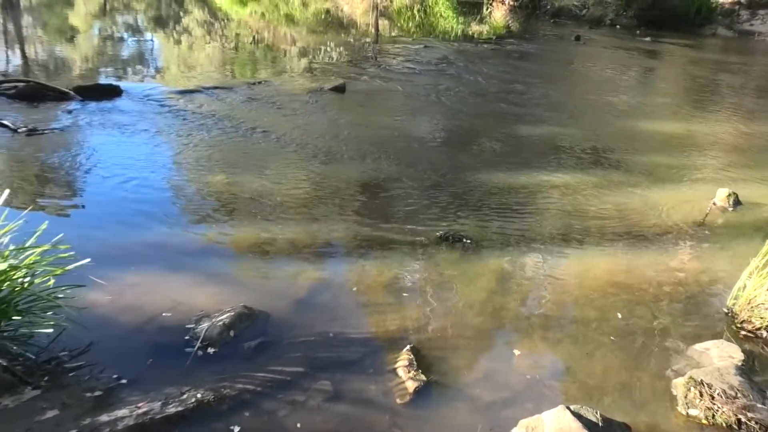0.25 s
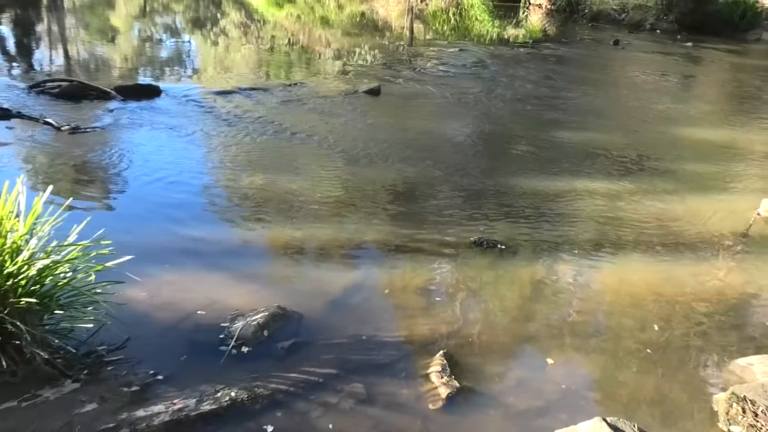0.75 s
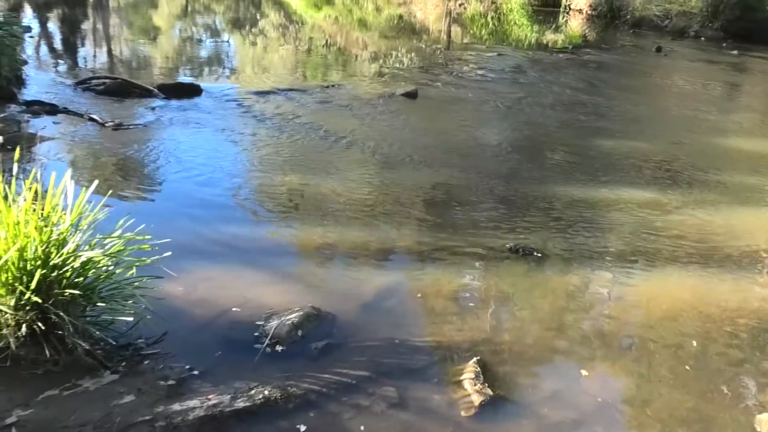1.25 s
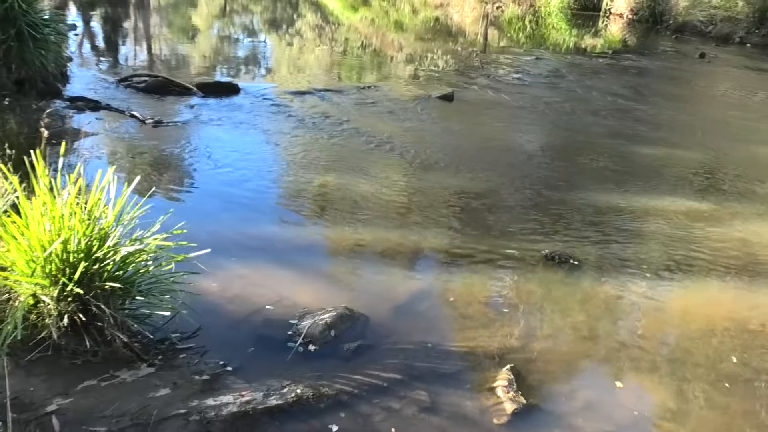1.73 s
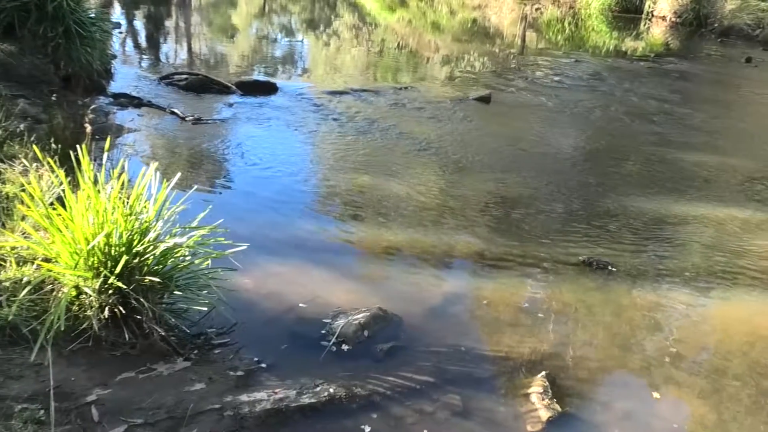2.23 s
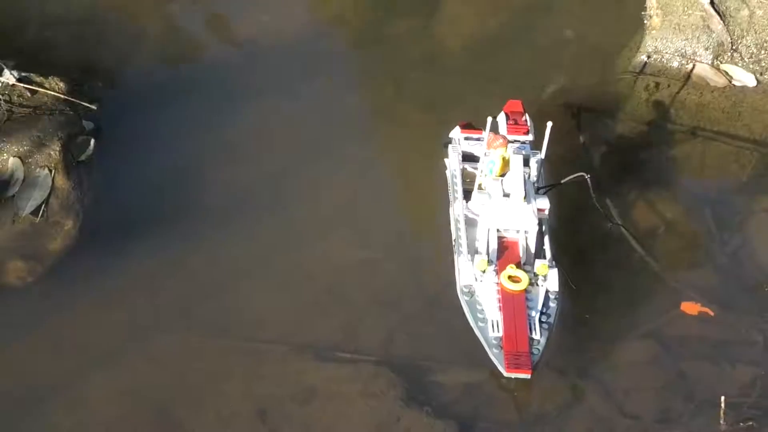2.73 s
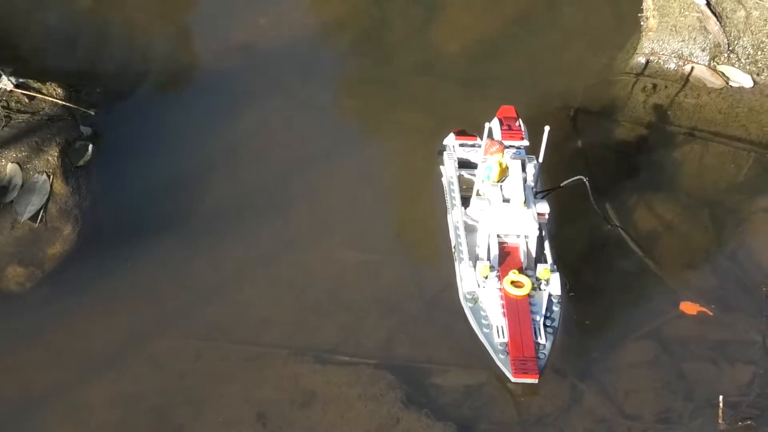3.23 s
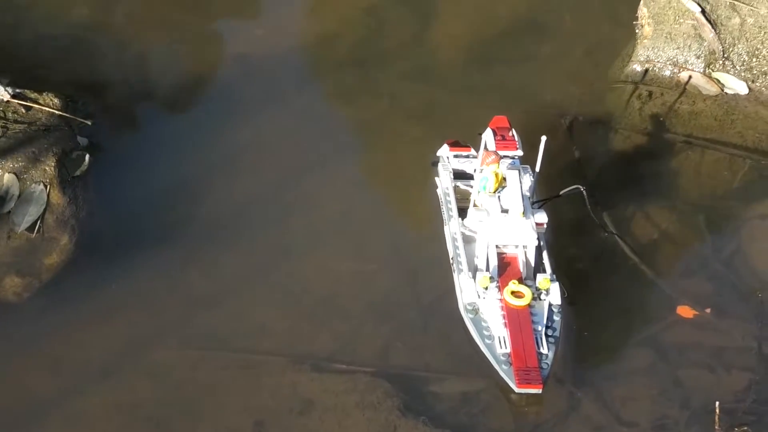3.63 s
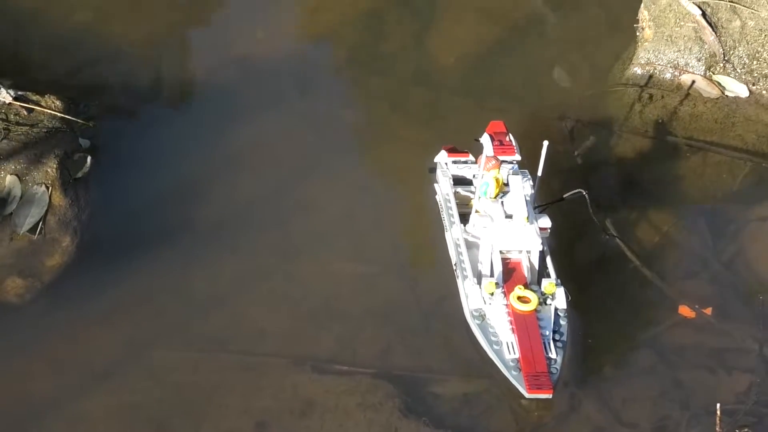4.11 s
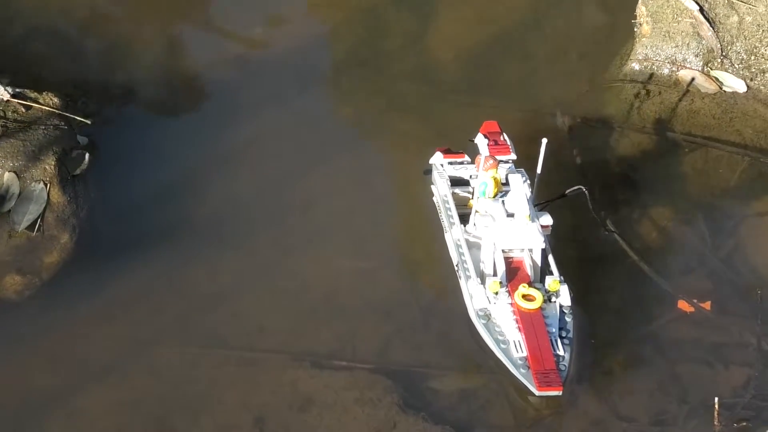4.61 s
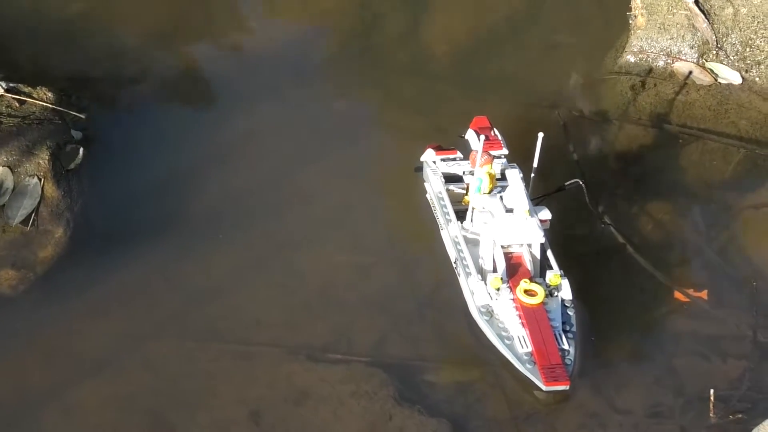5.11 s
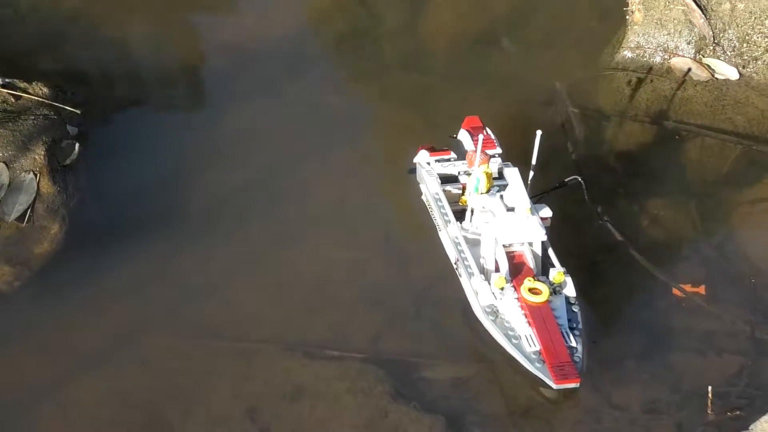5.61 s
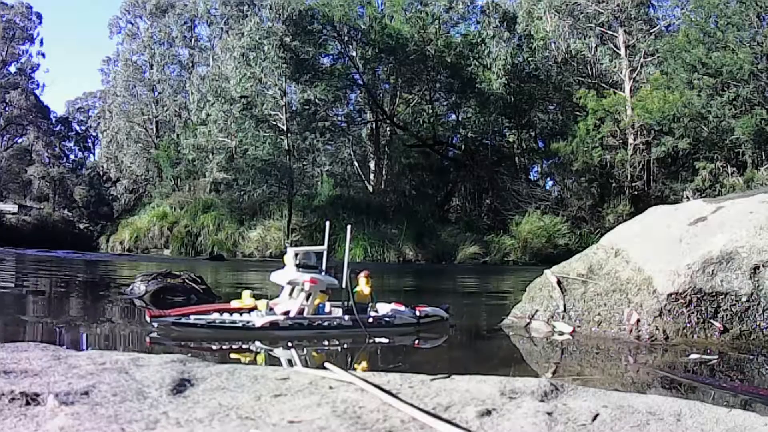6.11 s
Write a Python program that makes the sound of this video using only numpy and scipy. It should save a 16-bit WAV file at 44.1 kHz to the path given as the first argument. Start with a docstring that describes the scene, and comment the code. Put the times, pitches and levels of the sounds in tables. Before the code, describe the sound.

A shallow creek rushes steadily over rocks outdoors, with a few small plops and faint, thin high chirps. Wind presses on the microphone above a deep roll of water and a wavering low hum. About halfway, the water sounds nearer, with tiny ticks of spray. Near the end it all cuts abruptly to a much quieter spot with a far trickle and faint hiss.

```python
"""A shallow creek rushes over rocks, heard from the bank and, after about 3 s, from nearer the water.
Countless small bubbles, each a resonating pocket of air, make the rush; a few plops, ticks of spray and
thin, high chirps stand out. Wind presses on the microphone over a deep roll of water and a wavering hum.
Near the end the sound cuts to a much quieter spot with a far trickle and faint hiss."""
import sys
import numpy as np
from scipy import signal
from scipy.fft import rfft, irfft, next_fast_len
from scipy.io import wavfile
from scipy.ndimage import uniform_filter1d

SR = 44100
rng = np.random.default_rng(int(sys.argv[2]) if len(sys.argv) > 2 else 0)


def store_pcm(level_fs):
    """Save levels as 16-bit WAV."""
    pcm = np.round(np.clip(level_fs, -1, 1) * 32767).astype(np.int16)
    wavfile.write(sys.argv[1], SR, np.atleast_2d(pcm).T)


N = 280022

# Listening position: (time [s], nearness [0 bank to 1 waterside])
NEARNESS_CURVE = [(0, 0.22), (2.95, 0.015), (3.2, 0.68), (5.8, 0.86)]
# Loudness of the rush: (time [s], level [dB])
RUSH_LEVEL = [(0, -31.5), (.9, -32), (2.7, -32.5), (3.2, -31.5), (4.0, -30.5), (5.25, -31), (5.8, -31)]
# Emphasis of the rush around 3 kHz: (time [s], gain [dB])
FIZZ_GAIN = [(0, 1), (1.6, 0), (2.6, -1.3), (3.3, -0.5), (4, 0.5), (5.8, 0)]
# Spectrum of the rush at each position: (frequency [Hz], relative density [dB])
RUSH_BANK_SPECTRUM = [(260, -64.5), (380, -63.5), (680, -60.5), (830, -66), (1020, -61.5), (1250, -67.5),
                      (1600, -66), (2280, -74), (3500, -73.5), (4650, -76.5), (5020, -82), (6400, -89.5),
                      (7100, -91), (10500, -102.4), (15000, -114)]
RUSH_NEAR_SPECTRUM = [(270, -66.5), (540, -60.5), (1100, -63.5), (1520, -59.5), (1840, -68.5), (2020, -66),
                      (2250, -70.5), (3400, -76), (4640, -78.5), (4880, -85), (6500, -93.5), (7350, -90.5),
                      (10500, -102), (15000, -113)]
# Bubble plops and, at 7-8.5 kHz, thin chirps, perhaps distant birds:
# (time [s], level [dB], start frequency [Hz], glide [ratio], duration [s])
PLOPS_AND_CHIRPS = [(0.735, -30.5, 296, 1.47, 0.086), (0.874, -32.5, 1557, 0.96, 0.037),
                    (0.927, -30.5, 1198, 1.1, 0.016), (1.015, -40, 2240, 1.04, .024),
                    (1.762, -30, 3070, 1.35, 0.0076), (2.107, -47, 7100, 0.95, .024),
                    (2.312, -42, 5930, 0.77, 0.0089), (2.825, -54, 8400, 1.03, .015),
                    (3.355, -51, 7950, 1.03, .009), (3.438, -36, 3640, 1.2, 0.0072),
                    (3.913, -50, 7200, 1.2, .024), (4.208, -28.5, 1470, 1.15, 0.016),
                    (4.461, -37, 3700, 0.98, .008), (4.59, -53, 7300, 1.1, .03),
                    (4.728, -53, 7600, 0.95, .035), (5.035, -51.5, 7440, 0.98, .032),
                    (5.172, -53, 8500, 1, .03), (5.18, -49, 7600, 0.94, .036),
                    (5.485, -58, 7900, 0.96, .035), (5.598, -30, 1600, 0.99, 0.015),
                    (5.632, -23, 860, 1.27, 0.0154), (5.583, -37, 1520, 0.95, .012),
                    (5.663, -30, 740, 0.97, 0.012)]
# Ticks of spray: (time [s], peak level [dB])
SPRAY_EVENTS = [(3.263, -44), (3.436, -42), (4.0028, -39), (4.5819, -40), (4.5964, -41), (4.628, -43),
                (4.7251, -42), (4.8075, -44), (4.866, -45), (5.1037, -43), (5.1377, -39), (5.2255, -36),
                (5.2835, -44), (5.3314, -44), (5.371, -42), (5.4202, -43), (5.4685, -45), (5.5634, -46)]
# Gusts of wind: (time [s], level [dB])
WIND_LEVEL = [(0, -13.5), (.06, -10.5), (.25, -19), (.55, -16), (.72, -12.5), (.88, -20), (1.05, -13.5),
              (1.45, -13), (1.75, -16), (1.95, -20), (2.2, -8.5), (2.45, -12), (2.55, -23), (2.7, -15),
              (3.0, -18), (3.2, -23), (3.35, -17), (3.82, -15.5), (3.95, -24), (4.2, -23.5), (4.4, -30.5),
              (4.55, -19), (4.7, -21.5), (4.85, -16.5), (5.15, -21), (5.35, -18), (5.6, -21), (5.79, -20.5)]
# Spectrum of the wind pressure at each position: (frequency [Hz], relative density [dB])
WIND_BANK_SPECTRUM = [(1, -34), (6.5, -24), (10, -28), (17, -36), (24, -48), (34, -59)]
WIND_NEAR_SPECTRUM = [(1, -46), (5.5, -35), (10, -28.5), (17, -35), (24, -43), (34, -52)]
# Spectrum of the water's deep roll at each position: (frequency [Hz], relative density [dB])
ROLL_BANK_SPECTRUM = [(32, -50), (48, -52), (75, -55.5), (108, -57), (125, -68.5), (200, -64.5)]
ROLL_NEAR_SPECTRUM = [(32, -76), (44, -49), (60, -59), (100, -60), (155, -58), (200, -60)]
# Tones of the hum at each position: (frequency [Hz], bandwidth [Hz], relative level [dB])
HUM_BANK_TONES = [(55.8, 13, -45.5), (111.4, 5.8, -47.5)]
HUM_NEAR_TONES = [(85.7, 15.3, -42.5), (123.4, 8.5, -47), (147, 8.4, -45)]
# Swells of the strongest low tone: (time [s], level [dB])
DRONE_LEVEL = [(0, -33), (.25, -47), (.5, -39.5), (.7, -42.5), (.86, -35.5), (1.2, -34), (1.3, -54),
               (1.53, -32.5), (1.75, -54), (2.05, -36), (2.15, -51), (2.47, -33.5), (2.75, -42),
               (2.95, -59), (3.2, -37), (3.3, -54), (3.7, -51), (3.81, -34), (3.95, -57)]
# Spectrum of the quiet spot: (frequency [Hz], relative density [dB])
QUIET_SPECTRUM = [(35, -108), (90, -94.5), (130, -91), (200, -87.5), (330, -92), (420, -89.5), (730, -94),
                  (1100, -94.5), (1290, -89), (1500, -97), (2200, -100), (4000, -103), (12600, -105),
                  (12900, -145)]


def rush(froth_share=0.25, patch_db=0.54, surge_db=0.53, spray_db=0.9, drift_db=0.3):
    """Incoherent sources add in power: froth and far hiss merge, coloured by the listening position."""
    water = crossfade(rng.standard_normal(N), froth(), froth_share)
    hz, t, spectrum = signal.stft(water, SR, nperseg=512, noverlap=384)
    near = follow(NEARNESS_CURVE, t)
    bank_db, near_db = spectrum_db(RUSH_BANK_SPECTRUM, hz), spectrum_db(RUSH_NEAR_SPECTRUM, hz)
    colour = gain_of(np.outer(bank_db, 1 - near) + np.outer(near_db, near))
    colour /= np.sqrt(np.mean(colour ** 2, axis=0))  # equal power at every position
    patches = random_patches(spectrum.shape, bins=8, frames=24)
    surges = random_drift(len(t), frames=9)  # shared by all frequencies
    treble_db = spray_db + drift_db * random_drift(len(t), frames=50)
    treble_band = 1 / (1 + (5500 / (hz + 1)) ** 6)
    fizz_band = 1 / (1 + (np.log((hz + 1) / 3000) / 0.26) ** 4)
    level_db = follow(RUSH_LEVEL, t) + patch_db * patches + surge_db * surges
    level_db += np.outer(treble_band, treble_db) + np.outer(fizz_band, follow(FIZZ_GAIN, t))
    return signal.istft(spectrum * colour * gain_of(level_db), SR, nperseg=512, noverlap=384)[1][:N]


def froth(base_rate=5000, cycles=6.24, spread_db=3.8, sizes=36):
    """Superposition: bubbles of many sizes ring at random times and sum to a broad, flat spectrum."""
    out = np.zeros(N)
    for hz in np.geomspace(220, 15000, sizes):
        births = rng.random(N) < base_rate * np.sqrt(hz / 2000) / sizes / SR  # small ones are commoner
        strength_db = spread_db * min(hz / 3000, 1) ** 0.43 * np.minimum(rng.exponential(1, N), 2.2)
        ring = gliding_tone(hz * 0.9034, glide=1.204, seconds=cycles / hz)
        out += np.sqrt(hz) * unit_rms(signal.oaconvolve(gain_of(strength_db) * births, ring)[:N])
    return unit_rms(out)


def gliding_tone(hz, glide, seconds, taper=2):
    """A resonance that glides in pitch, as an air pocket's does when it rises toward the surface."""
    length = max(round(seconds * SR), 8)
    progress = np.arange(length) / length
    turns = np.cumsum(hz * glide ** progress) / SR
    envelope = abs(np.sin(np.pi * progress ** .5)) ** taper  # fast swell, slower fade
    return np.sin(2 * np.pi * turns) * envelope


def plops_and_chirps():
    """Resonant bubble plops and thin, high chirps; noise modulation adds flutter to the higher tones."""
    out = np.zeros(N)
    for start, db, hz, glide, seconds in PLOPS_AND_CHIRPS:
        tone = gliding_tone(hz, glide, seconds, taper=0.49)
        flutter = unit_rms(np.convolve(rng.standard_normal(4500), np.hanning(72), "valid"))
        flutter_share = np.clip((hz - 1500) / 8000, 0, 1)
        add(out, start, gain_of(db) * tone * crossfade(1, flutter[:len(tone)], flutter_share))
    return out


def spray(t60_s=0.021):
    """A brief splash has a broad spectrum: each tick is a bright puff of exponentially decaying noise."""
    out, t = np.zeros(N), np.arange(600) / SR
    band = signal.butter(3, [4200, 10000], "band", fs=SR, output="sos")
    tilt = signal.butter(1, 3500, fs=SR, output="sos")  # favours the low edge of the band
    for start, db in SPRAY_EVENTS:
        puff = rng.standard_normal(len(t)) * gain_of(-60 * t / t60_s)
        tick = signal.sosfilt(np.vstack([band, tilt]), puff)
        add(out, start, gain_of(db) * tick / abs(tick).max())
    return out


def wind():
    """Moving air exerts a slowly fluctuating pressure on the microphone, largely infrasonic."""
    pressure = at_listener(coloured_noise(WIND_BANK_SPECTRUM), coloured_noise(WIND_NEAR_SPECTRUM))
    return gain_of(follow(WIND_LEVEL, np.arange(N) / SR)) * steadied(pressure, 0.26)


def rumble(roll_balance_db=-37.5, gain_db=-35.5):
    """The water's deep roll and the hum superpose and share one envelope."""
    roll = at_listener(coloured_noise(ROLL_BANK_SPECTRUM), coloured_noise(ROLL_NEAR_SPECTRUM))
    tones = at_listener(hum(HUM_BANK_TONES), hum(HUM_NEAR_TONES))
    return gain_of(gain_db) * steadied(unit_rms(gain_of(roll_balance_db) * roll + tones), 0.27)


def hum(tones):
    """Narrow-band noise is heard as a tone that wavers in level and pitch."""
    out, t = np.zeros(N), np.arange(N) / SR
    for hz, width_hz, db in tones:
        pole = np.exp(-np.pi * width_hz / SR)
        lowpass = [1 - pole], [1, -pole]
        slow = signal.lfilter(*lowpass, signal.lfilter(*lowpass, rng.standard_normal((2, N))))
        tone = (slow[0] + 1j * slow[1]) * np.exp(2j * np.pi * hz * t)
        out += gain_of(db) * unit_rms(tone.real)
    return out


def drone(hz=93.3, width_hz=4.5):
    """Amplitude modulation: the strongest low tone comes and goes, then dies out near the water."""
    tone = steadied(hum([(hz, width_hz, 0)]), 0.12)
    return gain_of(follow(DRONE_LEVEL, np.arange(N) / SR, right=-90)) * tone


def quiet_spot(level_db=-58, patch_db=1.4):
    """A noise floor of still air, a far wavering trickle and the hiss of the microphone."""
    hz, _, spectrum = signal.stft(coloured_noise(QUIET_SPECTRUM), SR, nperseg=1024, noverlap=768)
    trickle_band = 1 / (1 + (hz[:, None] / 1800) ** 4)
    spectrum *= gain_of(patch_db * trickle_band * random_patches(spectrum.shape, bins=6, frames=6))
    return gain_of(level_db) * signal.istft(spectrum, SR, nperseg=1024, noverlap=768)[1][:N]


def at_listener(bank, near):
    """The listening position sets the share of power from bank and waterside."""
    return crossfade(bank, near, follow(NEARNESS_CURVE, np.arange(N) / SR))


def crossfade(first, second, share):
    """Square-root weights conserve the power of uncorrelated signals."""
    return np.sqrt(1 - share) * first + np.sqrt(share) * second


def coloured_noise(points):
    """Spectral shaping of white noise, scaled to unit rms."""
    size = next_fast_len(N)
    gains = gain_of(spectrum_db(points, np.fft.rfftfreq(size, 1 / SR)))
    return unit_rms(irfft(rfft(rng.standard_normal(size)) * gains, size)[:N])


def spectrum_db(points, hz):
    """Interpolation in log frequency, with a roll-off beyond the end points."""
    freqs, db = np.transpose(points)
    knots_hz = np.r_[freqs[0] / 2, freqs, freqs[-1] * 2, SR]
    knots_db = np.r_[db[0] - 30, db, db[-1] - 30, -200]
    return np.interp(np.log(hz + .1), np.log(knots_hz + .1), knots_db)


def steadied(x, seconds):
    """Compression by the running power softens chance swells."""
    power = abs(uniform_filter1d(x ** 2, round(seconds * SR)))
    return x / np.sqrt(power + .2)


def random_drift(length, frames):
    """A moving average of noise varies slowly."""
    return unit_rms(uniform_filter1d(rng.standard_normal(length), frames))


def random_patches(shape, bins, frames):
    """Smoothing correlates noise across frequency and time."""
    bands = uniform_filter1d(rng.standard_normal(shape), bins, axis=0)
    return unit_rms(uniform_filter1d(bands, frames, axis=1))


def gain_of(db):
    return 10 ** (np.asarray(db) / 20)


def unit_rms(x):
    return x / np.sqrt(np.mean(x ** 2) + 1e-20)


def follow(curve, t, right=None):
    return np.interp(t, *np.transpose(curve), right=right)


def add(mix, start_s, sound):
    part = mix[round(start_s * SR):][:len(sound)]
    part += sound[:len(part)]


def scene(cut_s=5.7918, fade_s=0.0004):
    """Sound pressures at the creek add linearly, until the cut to the quiet spot."""
    creek = rush() + plops_and_chirps() + spray() + wind() + rumble() + drone()
    after_cut = np.clip((np.arange(N) / SR - cut_s) / fade_s + 1, 0, 1)
    return ((1 - after_cut) * creek + after_cut * quiet_spot())[None]


def record(dry):
    """A linear-phase low-pass filter limits the band to 15.75 kHz."""
    taps = signal.firwin(511, 15750, window=("kaiser", 9), fs=SR)
    mirrored = np.pad(dry, ((0, 0), (255, 255)), "reflect")  # so the filter starts settled
    return signal.oaconvolve(mirrored, taps[None], "valid")


dry = scene()
out = record(dry)
store_pcm(out)
```